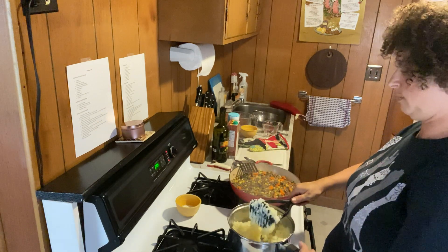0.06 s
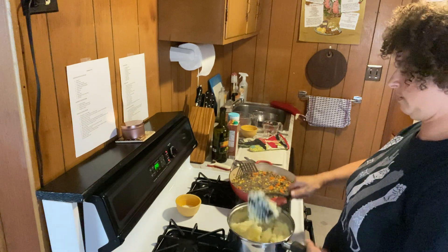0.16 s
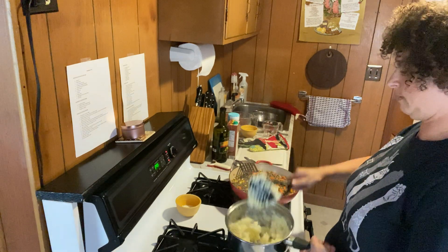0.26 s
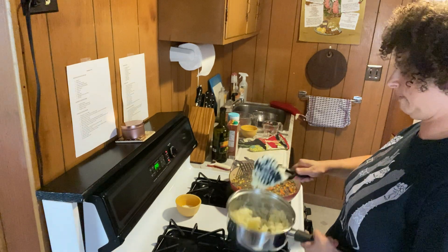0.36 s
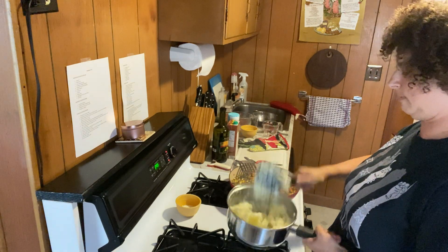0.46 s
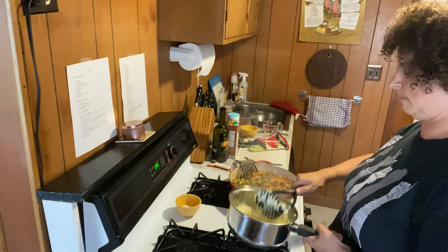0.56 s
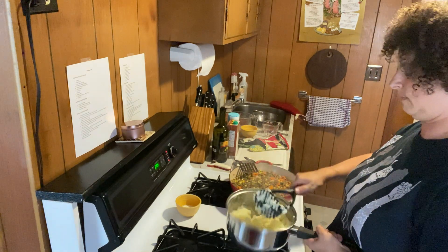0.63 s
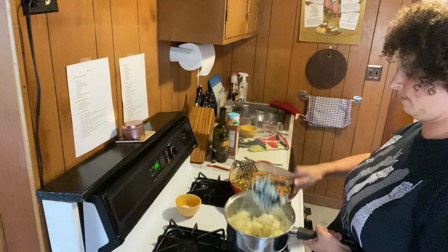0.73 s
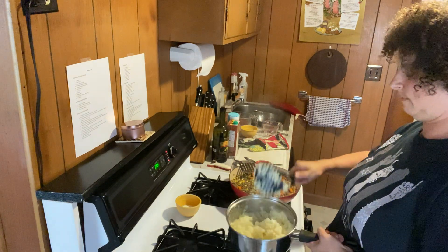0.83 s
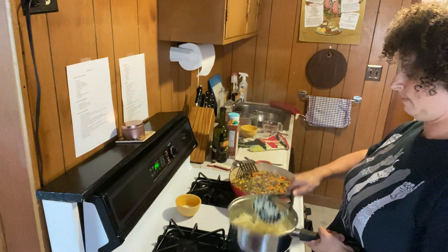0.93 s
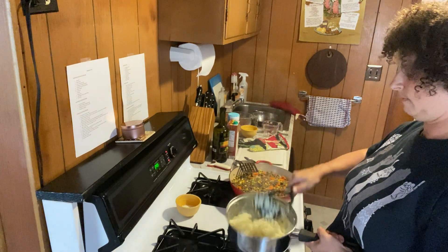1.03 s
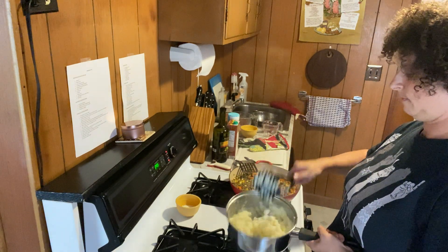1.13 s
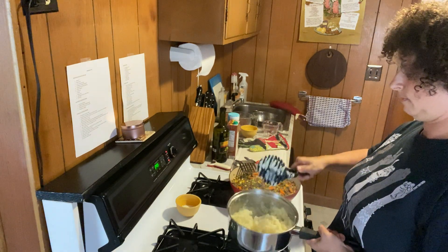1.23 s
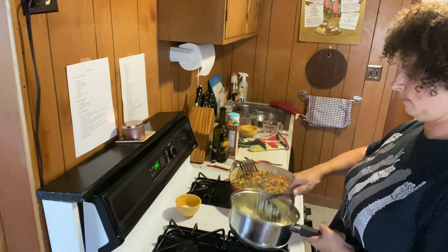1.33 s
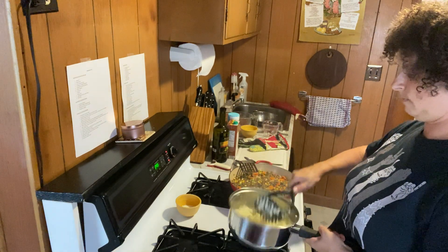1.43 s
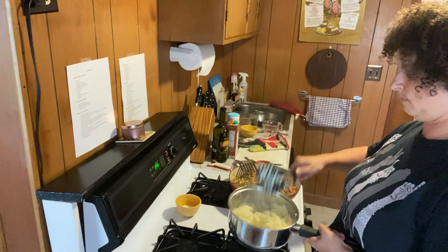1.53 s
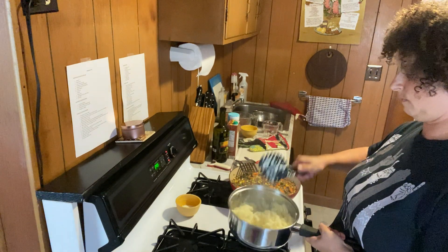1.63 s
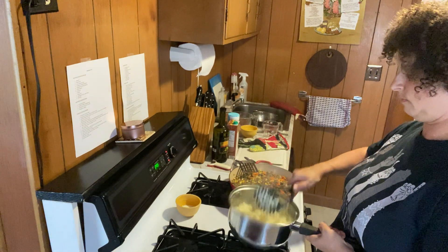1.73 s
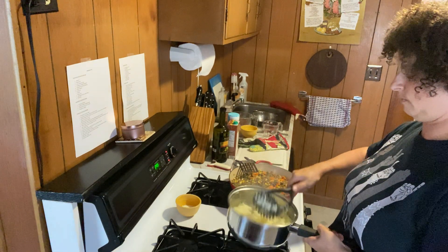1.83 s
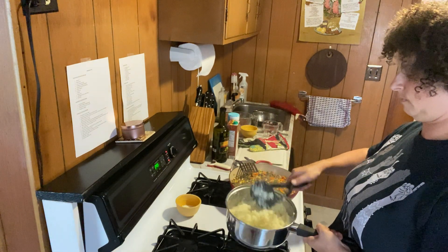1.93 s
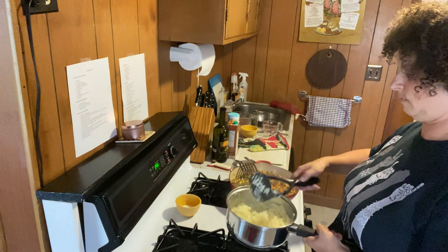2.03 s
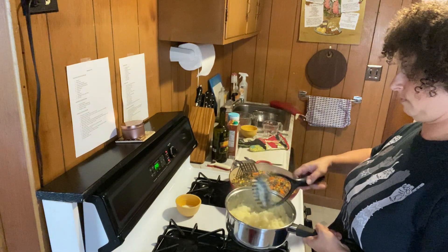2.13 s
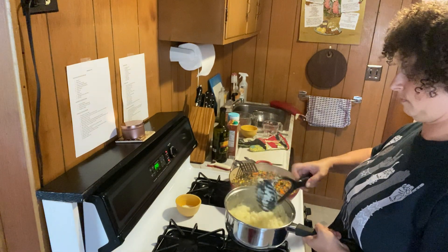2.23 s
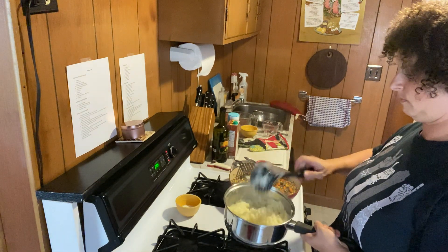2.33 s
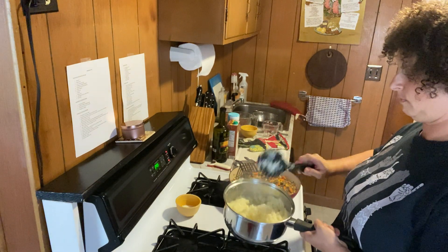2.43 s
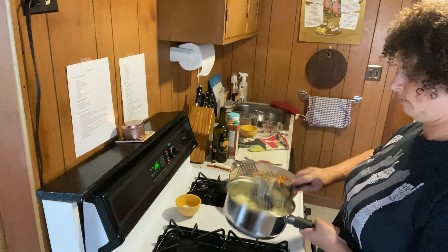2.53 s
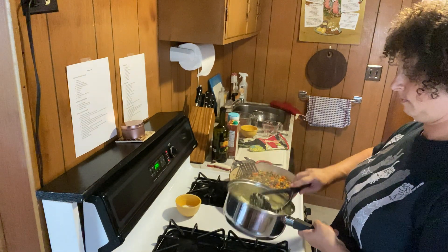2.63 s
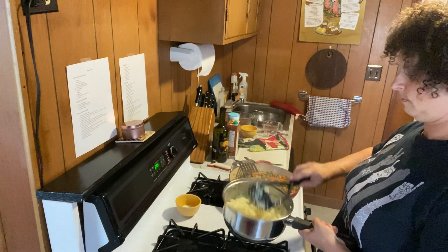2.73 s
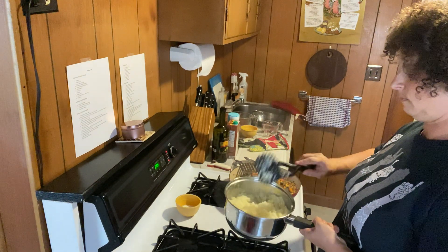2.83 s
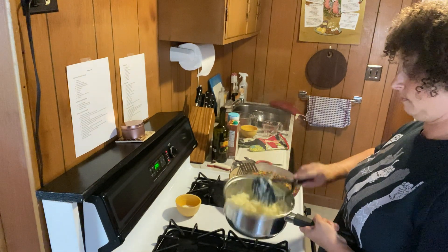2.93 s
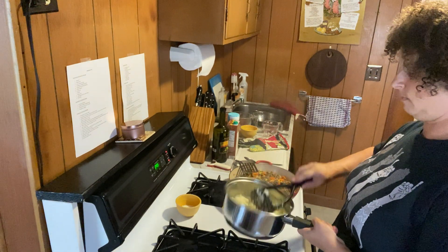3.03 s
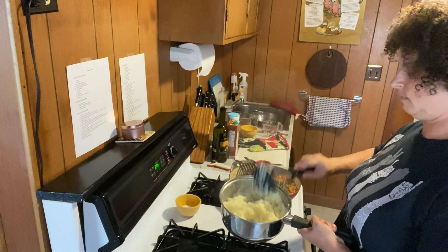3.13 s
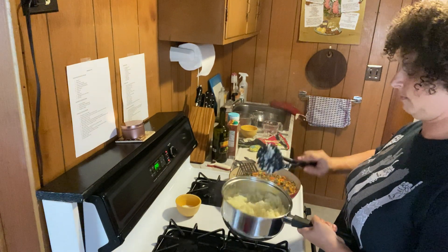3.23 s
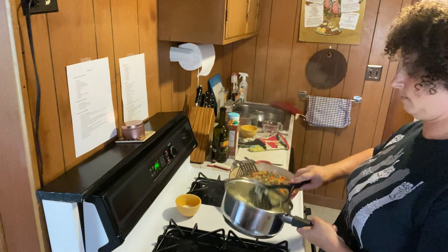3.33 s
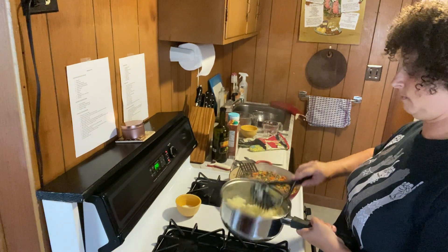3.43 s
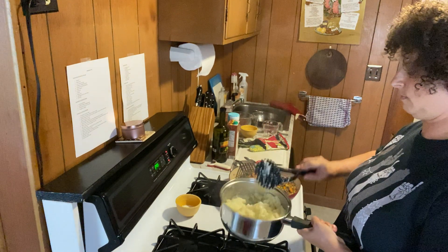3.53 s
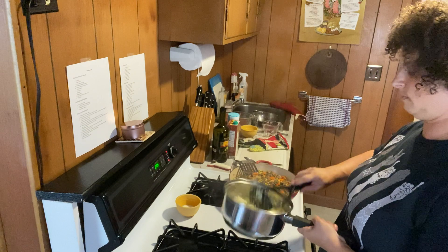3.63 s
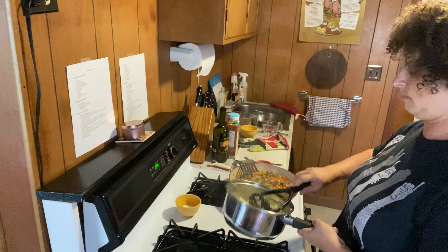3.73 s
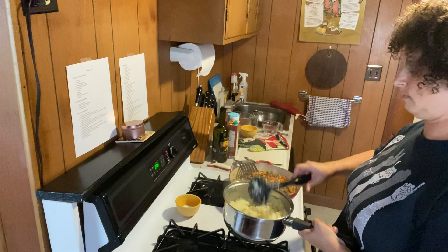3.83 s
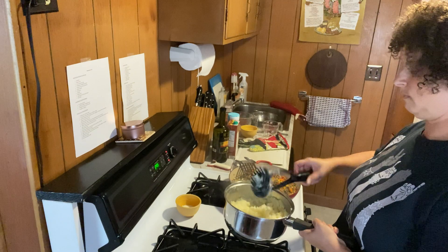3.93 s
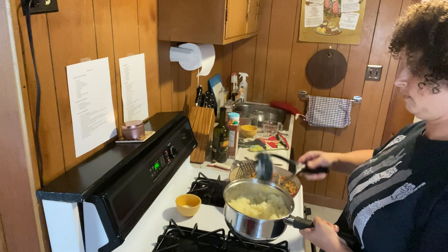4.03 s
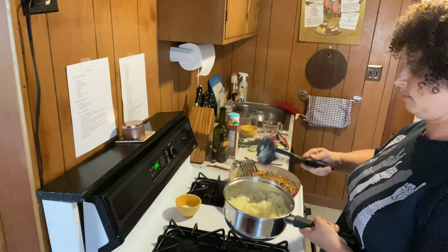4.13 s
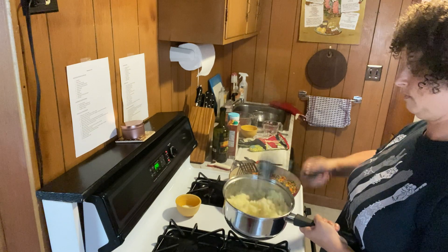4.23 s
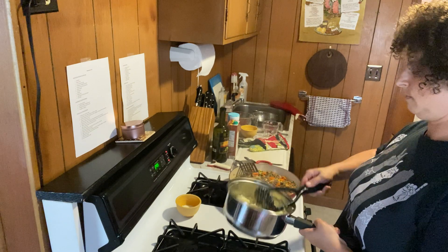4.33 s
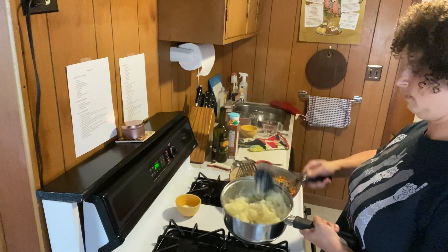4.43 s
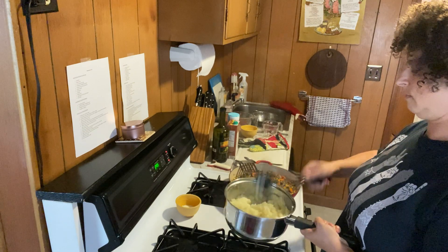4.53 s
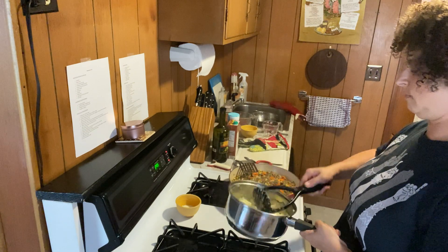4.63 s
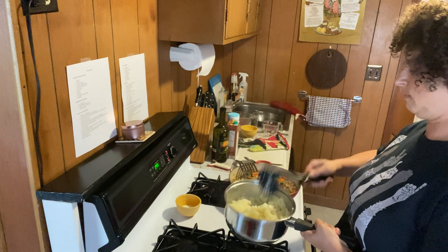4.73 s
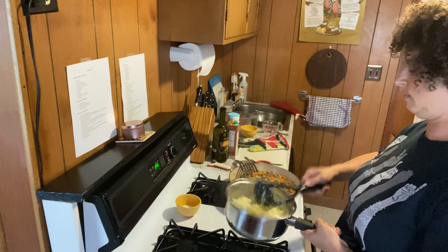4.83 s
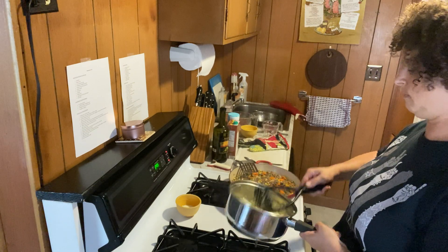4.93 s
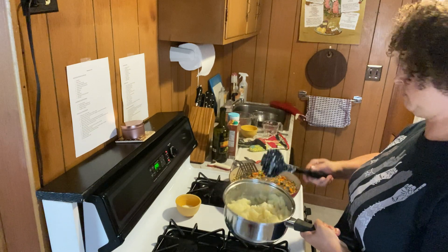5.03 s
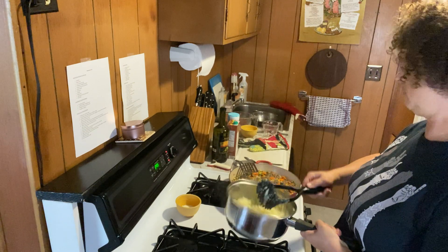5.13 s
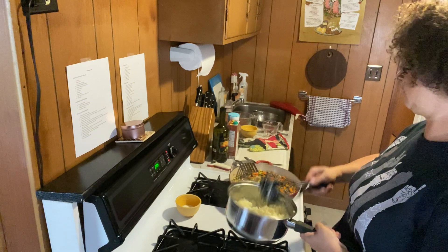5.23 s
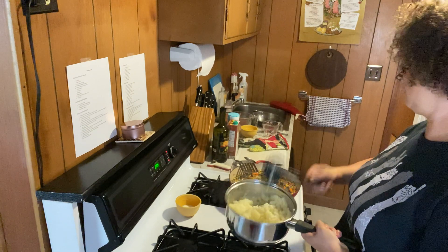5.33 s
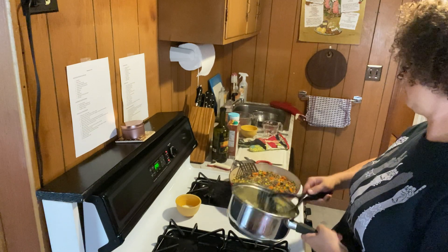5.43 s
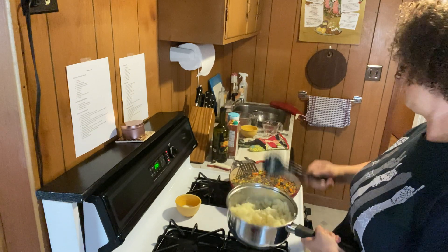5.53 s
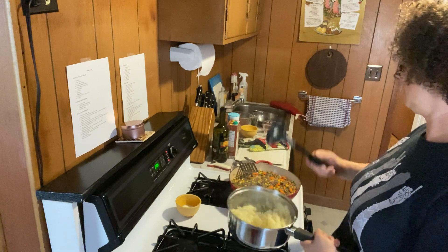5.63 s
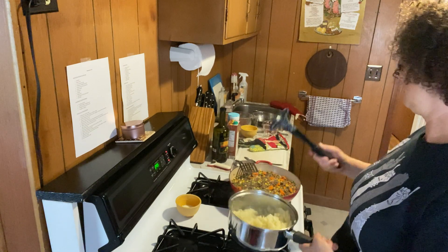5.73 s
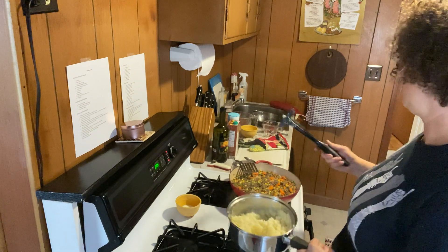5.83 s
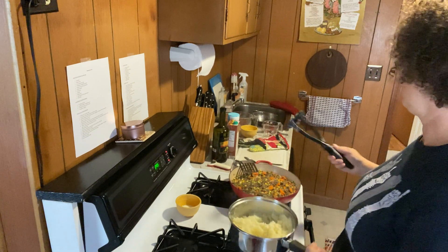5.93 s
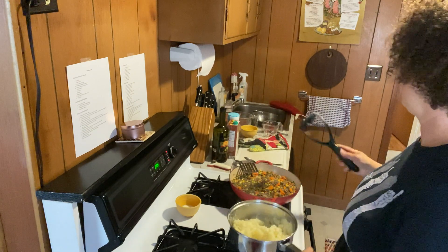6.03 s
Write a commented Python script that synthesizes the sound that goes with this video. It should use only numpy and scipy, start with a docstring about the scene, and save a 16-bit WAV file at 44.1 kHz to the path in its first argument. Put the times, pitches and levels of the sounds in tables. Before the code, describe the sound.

Wire masher rubs softly in potato, then raps a hand-held steel pot about every third of a second, short damped clanks over faint kitchen hush.

```python
"""Potato masher on a steel pot

A masher scrapes briefly through mash, then gives a hand-held steel pot thirteen raps and one light extra touch.
Each rap is a noisy touch, a dull thud and a rebound, shaped by the pot's resonances into a short clank.
The thuds weaken as potato is shaken off, quicker swings sound thinner, and a small panelled kitchen answers.
The scrape is grainy noise in four pushes; soft, wavering noise makes the kitchen's hush underneath.
"""
import sys
import numpy as np
from scipy import signal
from scipy.fft import rfft, irfft, next_fast_len
from scipy.io import wavfile
from scipy.ndimage import uniform_filter1d

SR = 44100
rng = np.random.default_rng(int(sys.argv[2]) if len(sys.argv) > 2 else 0)


def file_out(sig):
    """Save sig as 16-bit WAV at sys.argv[1]."""
    # one column per channel
    cols = np.atleast_2d(sig).T
    # limit, then scale
    lim = np.clip(cols, -1, 1)
    pcm = np.round(lim * 32767).astype(np.int16)
    wavfile.write(sys.argv[1], SR, pcm)


N = 267687  # length in samples
LAG_S = .000102  # direct sound reaches the left microphone later: the right one is nearer


def amp(db):
    """Turn decibels into a gain."""
    return 10 ** (np.asarray(db) / 20)


def unit(x):
    """Scale a sound to an rms of 1."""
    return x / np.sqrt(np.mean(x ** 2) + 1e-20)


def along(points, hz):
    """Read a curve of (Hz, value) points at any frequency, on a log axis."""
    f, v = np.transpose(points)
    return np.interp(np.log(hz + 1), np.log(f + 1), v)


def filtered(x, response):
    """Multiply the spectrum of a sound by a response that may also shift phase."""
    n = x.shape[-1]
    m = 2 * next_fast_len(n // 2 + 4096)  # spare room for the filter to ring out
    return irfft(rfft(x, m) * response(np.fft.rfftfreq(m, 1 / SR)), m)[..., :n]


def causal(gain):
    """Give a gain curve the phase of an object that rings only after it is struck."""
    cepstrum = irfft(np.log(np.maximum(gain, 1e-6)))
    half = len(cepstrum) // 2
    forward_only = np.r_[1, np.full(half - 1, 2), 1, np.zeros(half - 1)]
    return np.exp(rfft(cepstrum * forward_only))


def add(track, s, sound):
    """Mix a sound into the track from time s on."""
    part = track[..., max(round(s * SR), 0):][..., :sound.shape[-1]]
    part += sound[..., :part.shape[-1]]


def late_left(mono):
    """Make a sound stereo, reaching the left microphone slightly later than the right."""
    lag = np.array([[LAG_S], [0]])
    return filtered(mono, lambda hz: np.exp(-2j * np.pi * hz * lag))


def diffuse(size):
    """White noise from all sides, mostly alike at both microphones in the bass."""
    # left-right likeness: f/Hz, likeness (1 = the same on both sides)
    alike = [(60, 0.97), (130, 0.43), (290, 0.9), (640, 0.034), (1400, 0.11), (3000, 0.023), (8000, 0.14)]

    def shares(hz):
        turn = np.arccos(np.clip(along(alike, hz), -1, 1)) / 2
        return np.array([np.cos(turn), np.sin(turn)])

    mid, side = filtered(rng.standard_normal((2, size)), shares)
    return np.array([mid + side, mid - side])


def evened(x, width_hz):
    """Level the peaks and dips in the spectrum of a random stereo burst and set its energy to 1."""
    def response(hz):
        power = np.mean(abs(rfft(x, 2 * len(hz) - 2)) ** 2, axis=0)
        smooth_power = uniform_filter1d(power, max(int(width_hz / hz[1]), 1))
        return abs(smooth_power) ** -.5
    return filtered(x, response)


def hush(level_db=-52.5, waver_db=.7):
    """The low whirr and hiss of the kitchen: coloured noise whose bands waver a little."""
    # colour of the hush: f/Hz, relative level/dB per Hz
    colour = [(20, -25), (55, -9.5), (128, -7), (205, -13.5), (318, 0.5), (500, -5), (640, -3),
              (1100, -9.5), (2560, -14), (5000, -16.5), (7000, -12.5), (9200, -21), (14500, -28.5),
              (16200, -59)]
    noise = filtered(diffuse(N), lambda hz: amp(along(colour, hz)))
    z = signal.stft(noise, nperseg=1024)[2]
    # smooth random patches over neighbouring frequencies, then over time
    patches = uniform_filter1d(rng.standard_normal(z.shape[1:]), size=5, axis=0)
    patches = uniform_filter1d(patches, size=10, axis=1)
    wavering = signal.istft(z * amp(waver_db * unit(patches)), nperseg=1024)[1][:, :N]
    return amp(level_db) * unit(wavering)


def scrape(slip_db=-2, slip_t60=0.12, slip_bright_db=6, grain_db=-1.0, grain_rate=400):
    """Each push starts with a bright slip, then drags through sticky potato in small grains and dies away."""
    # pushes through the mash: t/s, level/dB
    pushes = [(0.0, -39.5), (0.046, -41), (0.118, -39), (0.18, -40.5)]
    # colour of the rubbing: f/Hz, relative level/dB per Hz
    mash = [(20, -23), (45, -10), (90, 0), (190, -12), (300, -1.5), (540, -9), (700, -5.5), (1400, -3.5),
            (1900, -5.5), (2400, -6.5), (2900, -12.5), (5000, -23.5), (8400, -22.5), (15000, -71)]
    rise_s, hold_s, drag_t60 = 0.001, 0.034, 0.3  # t60: seconds to fall by 60 dB
    t = np.arange(SR // 2) / SR
    rise = 1 - np.exp(-t / rise_s)
    push = rise * amp(-60 * np.maximum(t - hold_s, 0) / drag_t60)
    drag_power, slips = np.zeros((2, N))
    for start, db in pushes:
        add(drag_power, start, (amp(db) * push) ** 2)
        add(slips, start, rise * amp(db + slip_db - 60 * t / slip_t60))
    # a random level grain_rate times a second, joined by straight lines
    grain_level = np.interp(np.arange(N) / SR * grain_rate, np.arange(N), rng.standard_normal(N))
    grains = amp(grain_db * grain_level)

    def rub(bright_db):
        def colour(hz):
            return amp(along(mash, hz) + along([(1500, 0), (3500, bright_db)], hz))
        return unit(filtered(grains * diffuse(N), colour))

    return np.sqrt(drag_power) * rub(0) + slips * rub(slip_bright_db)


def room(t, rise=0.0034, far_wall_s=0.04, far_wall_db=2.5, far_wall_spread=0.029):
    """The kitchen's echo builds up, swells as the far wall answers, and each frequency dies at its own speed."""
    # how long the echo takes to fall by 60 dB: f/Hz, t60/s
    kitchen = [(70, 0.17), (300, 0.24), (650, 0.28), (1500, 0.27), (3000, .33), (8000, 0.25), (14000, 0.24)]
    # treble that walls and cloth swallow at once: f/Hz, change/dB
    absorbed = [(3000, 0), (7000, -1.5), (13000, -4)]
    hz, s, z = signal.stft(diffuse(len(t)), SR, nperseg=256)
    # more is lost as time goes on
    fade_db = along(absorbed, hz)[:, None] - 60 * s / along(kitchen, hz)[:, None]
    tail = signal.istft(z * amp(fade_db), SR, nperseg=256)[1][:, :len(t)]
    swell_db = far_wall_db * np.exp(-((t - far_wall_s) / far_wall_spread) ** 2)
    return tail * amp(swell_db) * (1 - np.exp(-t / rise))


def contact(t, crack_t60=0.00067, chatter_t60=0.019, chatter_rise=0.0029,
            stove_db=-7, stove_t60=0.094, stove_rise=0.0031):
    """Steel cracks on steel and chatters for a few ms; stove top and wall throw sound straight back."""
    # the first hard touch is bright: f/Hz, relative level/dB
    crack_colour = [(500, -5.5), (1500, -20), (4000, -0.5), (12000, 13)]
    crack_db, chatter_db = 3, 4
    crack = filtered(rng.standard_normal(len(t)), lambda hz: amp(along(crack_colour, hz)))
    crack = crack * amp(crack_db - 60 * t / crack_t60)
    chatter = rng.standard_normal(len(t)) * amp(chatter_db - 60 * t / chatter_t60)
    chatter = chatter * (1 - np.exp(-t / chatter_rise))
    near = diffuse(len(t)) * amp(stove_db - 60 * t / stove_t60) * (1 - np.exp(-t / stove_rise))
    return late_left(crack + chatter) + near


def thud(t, load):
    """One dull push of the masher's weight on the rim, harder when it is laden with potato."""
    empty_db, load_db = 8, 14.5  # load_db is the extra at full load
    rate = 2 * np.pi * 1800  # the push fades at this rate per second, dulling it above 1800 Hz
    push = rate / SR * np.exp(-rate * t)
    return amp(empty_db + load_db * load) * late_left(push)


def body(hz, scatter_db=-1.6, detune=0.0009):
    """Gain of pot and masher; each rap lands on a new spot and wakes the modes differently."""
    # modes damped by the mash and the hands: f/Hz, width/Hz, level/dB before scatter
    modes = [(319.6, 31, -21), (423, 24, -10), (498.3, 19, -5), (592.6, 26.7, -2), (680, 26, 2.5),
             (789, 46, -5.5), (937, 24, -8.5), (1054, 67, -9), (1194, 52, -11), (1284, 48, -6),
             (1400, 40, -10.5), (1444, 90, -16.5), (2110, 11.4, -6.5), (2698, 17.5, -2), (2880, 19, -7.5),
             (3448, 18, -8.5), (3684, 19, -11.5), (4780, 16, -6), (5300, 38, -36), (6880, 420, -15),
             (7976, 267, -9.5), (8930, 164, -14), (11970, 130, -18), (13020, 300, -20)]
    # the crowd of overlapping resonances between the modes: f/Hz, level/dB
    crowd = [(25, -38), (100, -28.5), (230, -37), (450, -59), (900, -23), (1450, -14.5), (1850, -18.5),
             (2900, -11), (4500, -15.5), (6300, -15), (8700, -54.5), (14700, -132), (16200, -88)]
    centre, width, db = np.transpose(modes)[:, :, None]
    strength, shift = rng.standard_normal((2, len(modes), 1))
    tuned = centre * (1 + detune * shift)
    off_tune = (hz ** 2 - tuned ** 2) / ((hz + 1) * width)
    peaks = amp(db + scatter_db * strength) ** 2 / (1 + off_tune ** 2)
    return np.sqrt(peaks.sum(axis=0) + amp(along(crowd, hz)) ** 2)


def ring(t, tone_hz, scatter_db=5.0, rise=0.0099, split=0.0051):
    """The pot sings on briefly once the masher has left the rim; the spot struck favours one tone."""
    # tones from low thump to bare steel: f/Hz, level/dB before lift and scatter, t60/s
    tones = [(70, -44, .28), (160, -45, .2), (629, -34, .28), (1356, -40, .26), (2110, -43, .3),
             (2707, -42, .32), (2900, -43, .33), (3407, -44, .35), (3920, -48, .7), (4866, -46, .34),
             (6982, -44, .28), (8016, -42, .28)]
    lift_db = 9
    hz, db, t60 = np.transpose(tones)[:, :, None]
    favoured = abs(hz - tone_hz) == abs(hz - tone_hz).min()
    level = db + lift_db * favoured + scatter_db * rng.standard_normal(db.shape)
    apart = np.minimum(hz / 2000, 1)  # long waves reach both microphones in step
    phases = 2 * np.pi * apart * rng.random((2, 2, len(tones), 1))
    # a pot is never quite round, so each mode is a slowly beating pair
    first = np.sin(2 * np.pi * hz * t + phases[0])
    second = .5 * np.sin(2 * np.pi * hz * (1 + split) * t + phases[1])
    fading = amp(level - 60 * t / t60) * (first + second)
    return fading.sum(axis=1) * (1 - np.exp(-t / rise))


def tint(hz, heft_db, spot_hz, spot_db):
    """Colour of one rap in dB: its heft fills out the body, the spot on the rim picks the modes."""
    # how much of the heft each frequency gets: f/Hz, share
    heft_reach = [(100, 0.28), (220, 0.29), (400, 1), (680, 0.87), (1000, 0.69), (1400, 0.0031), (2400, 0)]
    spot_octaves = 0.09  # width of the family of modes that moves most at the spot struck
    node_share, node_ratio = 0.62, 0.66  # opposite change in the family below: its share and pitch ratio

    def around(centre_hz):
        return np.exp(-(np.log2((hz + 1) / centre_hz) / spot_octaves) ** 2)

    spot = around(spot_hz) - node_share * around(node_ratio * spot_hz)
    return heft_db * along(heft_reach, hz) + spot_db * spot


def raps(clank_db=34.5, room_db=-10, even_hz=130, ring_db=-1):
    """Each rap is a contact, a thud and a rebound, sounding through the pot; quicker raps are thinner."""
    # raps: t/s, force/dB, f/Hz the spot favours, its lift/dB, rebound delay/s, singing tone f/Hz
    rows = [(0.549, -1.9, 1348, 9.5, 0.0031, 2110), (0.9621, -0.6, 1130, 4, 0.0032, 630),
            (1.348, 0, 1340, 7.5, 0.0041, 2110), (1.7475, -0.4, 1260, 8.5, 0.0028, 2110),
            (1.791, -11.5, 627, 11.5, .008, 630), (2.5798, 0.2, 623, 1, .0099, 630),
            (2.9724, 1, 576, -1, 0.0051, 630), (3.339, 1.23, 990, 6.5, 0.0052, 2110),
            (3.654, 0.5, 570, 3, 0.0054, 4870), (4.295, 0.5, 580, 0.5, .012, 8016),
            (4.627, -0.5, 864, 2.5, 0.0088, 2710), (4.894, -2, 749, 3, 0.0029, 2710),
            (5.1738, -1.7, 1020, 10, 0.0037, 3920), (5.4283, 0, 976, 8.5, .003, 2710)]
    # time between raps for the shortest flick and for a full swing: t/s, t/s
    swing_limits = (.26, .42)
    # stereo balance: f/Hz, left minus right level/dB
    balance = [(150, 0.2), (380, 1), (700, -2.5), (1300, -1.5), (2400, 1), (4400, 1), (8000, 0)]
    thud_delay_s, rebound_db = 0.000967, -1  # the wire flexes before the weight bears on the rim
    heft_db_per_doubling, even_swing_s = 6.5, .36  # longer swings land heavier; the even one adds no heft
    load_life_s = 3.5  # time for the clinging potato to fall to 37 %
    out, t = np.zeros((2, N)), np.arange(SR // 2) / SR
    swings = np.clip(np.diff([row[0] for row in rows], prepend=0), *swing_limits)
    for (s, force_db, spot_hz, spot_db, delay, tone_hz), swing_s in zip(rows, swings):
        load = np.exp(-s / load_life_s)
        heft_db = heft_db_per_doubling * np.log2(swing_s / even_swing_s)
        blow = contact(t) + amp(room_db) * room(t)
        add(blow, thud_delay_s, thud(t, load))
        add(blow, delay, amp(rebound_db) * contact(t))  # the masher bounces and touches again
        clank = filtered(evened(blow, even_hz), lambda hz: causal(body(hz)))
        pot = amp(clank_db) * clank + amp(ring_db) * ring(t, tone_hz)
        tinted = filtered(pot, lambda hz: causal(amp(tint(hz, heft_db, spot_hz, spot_db))))
        add(out, s, amp(force_db) * tinted)
    return filtered(out, lambda hz: amp(along(balance, hz) * np.array([[.5], [-.5]])))


def scene():
    """Scrape and raps over the kitchen's hush."""
    return hush() + scrape() + raps()


def record(dry):
    """Round off the highest peaks smoothly below 0.9, then remove everything from 16500 Hz up."""
    rounded = dry / (1 + (dry / .9) ** 4) ** (1 / 4)
    return filtered(rounded, lambda hz: hz < 16500)


dry = scene()
out = record(dry)
file_out(out)
```